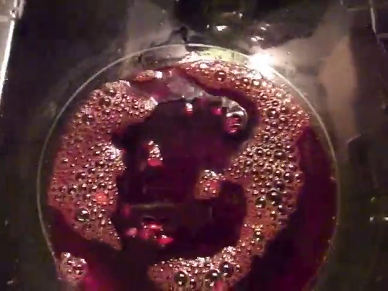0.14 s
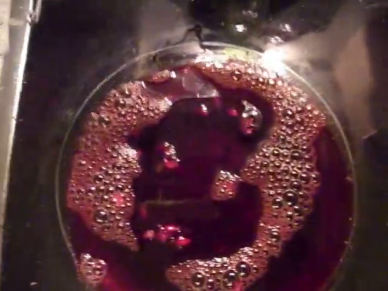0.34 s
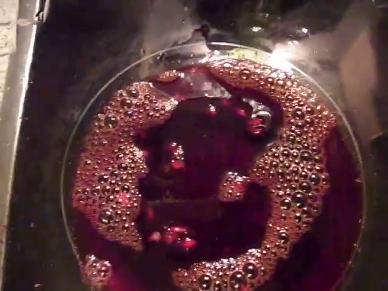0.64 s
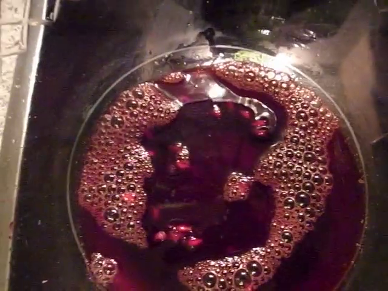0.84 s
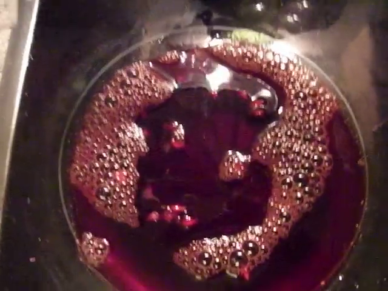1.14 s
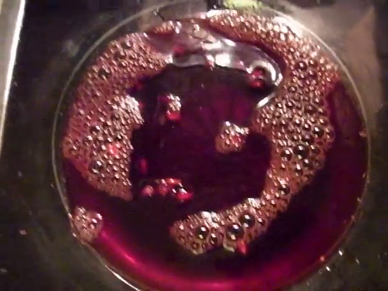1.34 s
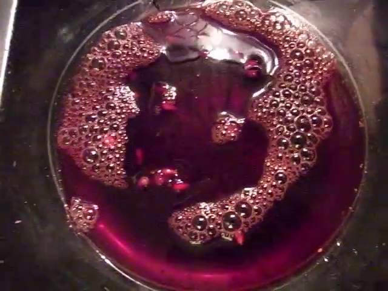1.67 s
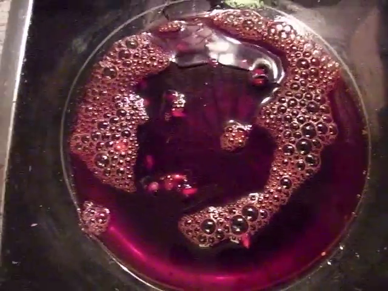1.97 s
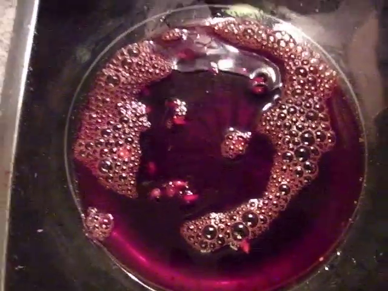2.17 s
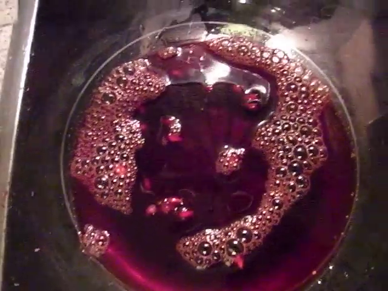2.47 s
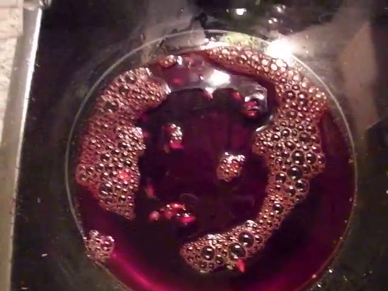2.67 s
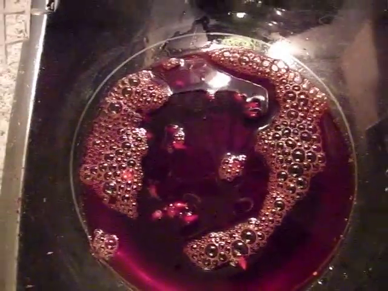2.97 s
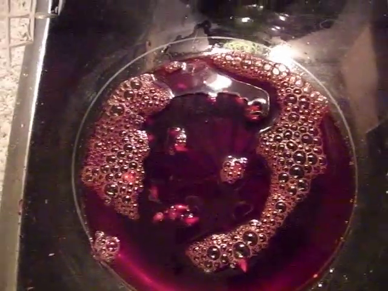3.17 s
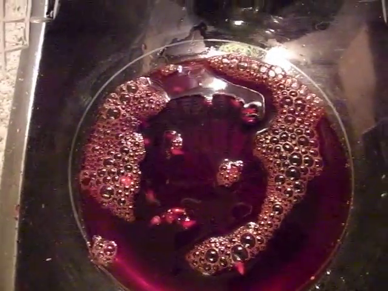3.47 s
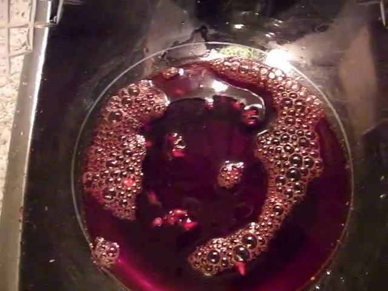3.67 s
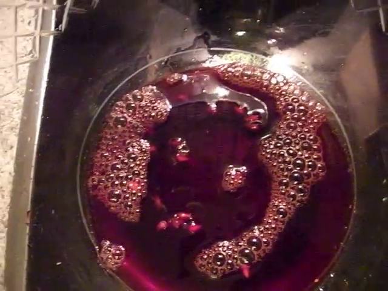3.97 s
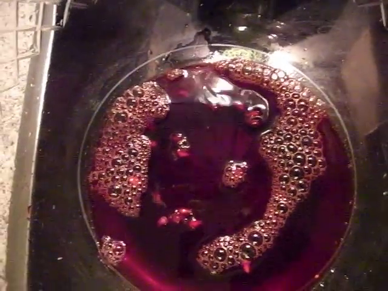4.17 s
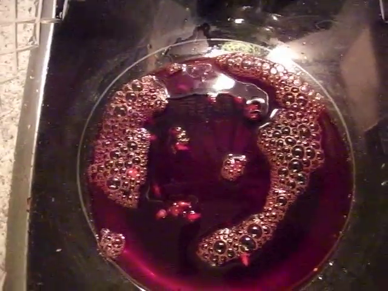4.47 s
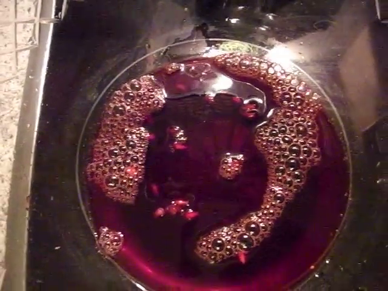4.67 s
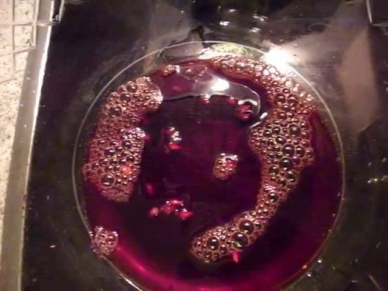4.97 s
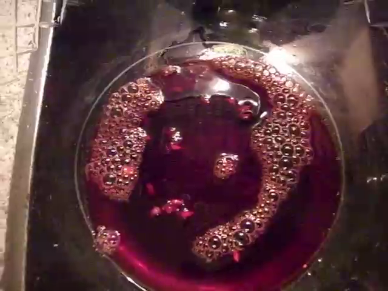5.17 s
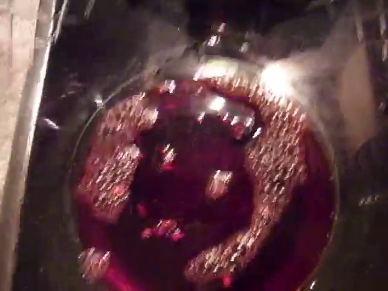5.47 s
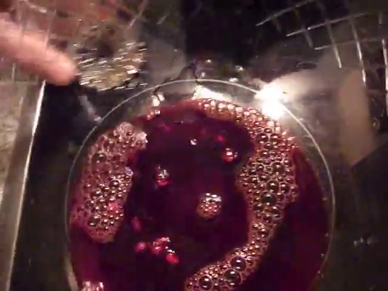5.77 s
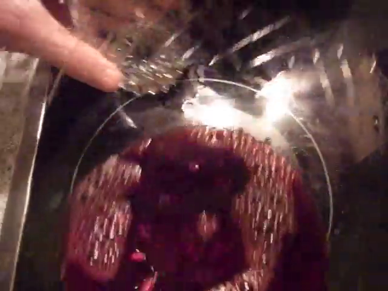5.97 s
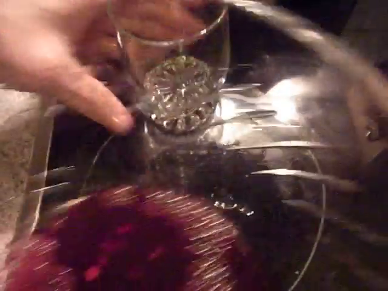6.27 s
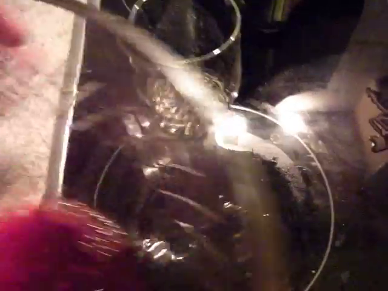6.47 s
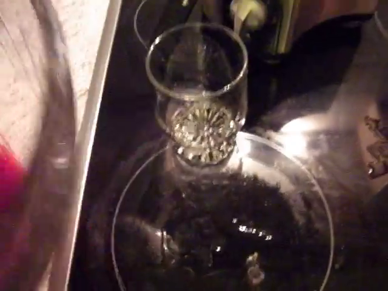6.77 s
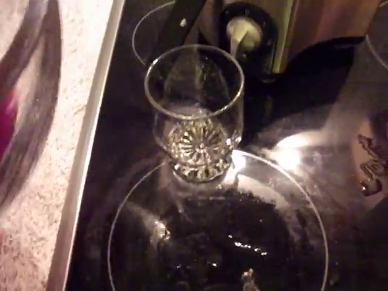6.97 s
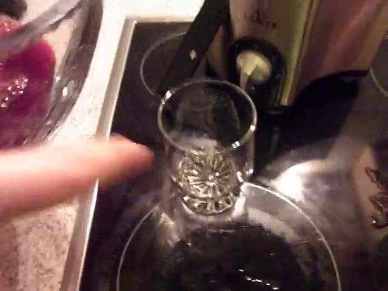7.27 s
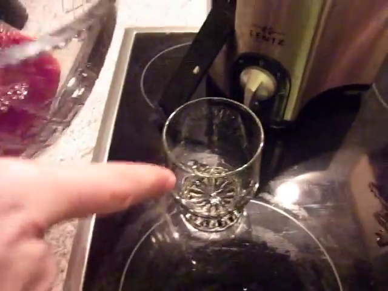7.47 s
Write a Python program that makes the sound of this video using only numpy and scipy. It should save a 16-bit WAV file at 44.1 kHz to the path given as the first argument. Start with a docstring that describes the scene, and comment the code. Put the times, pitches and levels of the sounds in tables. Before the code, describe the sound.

Close, muffled handheld pickup in a small hard kitchen: a metal utensil presses pulp in a wire strainer on a glass bowl, with dull thuds, short clinks and gritty wet grating. The pressing is busiest at first, then thins to faint ticks. Near the end the glass bowl knocks very loudly, distorting, rattles and scrapes over the hob, then leaves quiet room tone and soft bumps.

```python
"""Small hard kitchen: a metal utensil presses fruit in a wire strainer resting on a glass bowl.
Pushes thud as decaying low modes of bowl and worktop, with a wet puff of noise; metal clinks are noise cracks
with ringing modes; seeds grate as dense random slips. The bowl is then knocked and dragged aside on the hob.
Echo, room tone, deep camera jolts and soft bumps complete it; the narrow-band microphone clips on the
hardest knock."""
import sys
import numpy as np
from scipy import signal
from scipy.fft import rfft, irfft
from scipy.io import wavfile

SR = 44100
rng = np.random.default_rng(int(sys.argv[2]) if len(sys.argv) > 2 else 0)


def to_wav(sig):
    """Store sig (one row per channel, or 1-D mono) as 16-bit WAV at the path in sys.argv[1].

    Samples outside -1..1 are clipped; the rate is SR.
    """
    pcm = np.clip(np.atleast_2d(sig), -1, 1) * 32767
    pcm = np.round(pcm).astype(np.int16)
    wavfile.write(sys.argv[1], SR, pcm.T)  # frames by channels


N = 336042

# Steady kitchen air, relative spectrum: f/Hz, density/dB
ROOM_TONE_SPECTRUM = [(40, -14), (60, -5), (100, -1), (160, -4), (260, -2), (420, -3), (520, -8),
                      (650, -12), (1000, -14), (2000, -17), (3200, -20), (4100, -22), (5400, -40)]
# Echo decay: f/Hz, t60/s
KITCHEN_T60 = [(200, 0.37), (400, 0.41), (1200, 0.52), (4000, 0.18)]
# Jolts of the hand-held camera, felt as deep rumble: t/s, level/dB
JOLTS = [(0.0, -52.5), (0.251, -44), (1.25, -41.5), (2.05, -44), (3.08, -35), (3.82, -46.5), (4.8, -45),
         (5.741, -58), (6.55, -52), (6.95, -49.5), (7.271, -45.5)]
# Soft low bumps close to the microphone: t/s, peak/dB, f/Hz, rise and fall time constant/s
BUMPS = [(6.712, -37, 109, 0.0058), (7.267, -43, 110, 0.0063), (7.416, -30, 137, 0.0036)]
# Relative spectrum of hard contact noise: f/Hz, density/dB
CRACK_SPECTRUM = [(290, -19.5), (500, -0.5), (688, -11), (830, -10.5), (1480, -7.5), (1660, -10),
                  (2280, -16), (3260, -9.5), (4180, -23.5), (5430, -27.5), (9200, -120)]
# Relative spectrum of wet dull noise: f/Hz, density/dB
DULL_SPECTRUM = [(76, -29), (130, -10), (146, -5.5), (201, 6.5), (237, 0), (349, 0.5), (535, -5.5),
                 (618, -19.5), (800, -13), (1040, -44.5), (1760, -120)]
# Worktop boom modes: f/Hz, relative level/dB, free t60/s
BOOM_MODES = [(90.2, -14, 0.24), (101.7, -10, 0.3), (124, -13, 0.079)]
# Modes of the bowl on the worktop: f/Hz, relative level/dB, free t60/s
BOWL_MODES = [(214, -11, 0.085), (265.3, 1, 0.14), (305.2, -5.5, 0.2), (358.6, -1, 0.2),
              (398.7, -2.5, 0.28), (433, -8, 0.65), (505.8, 7, 0.059), (556.5, -1, .15)]
# Modes of strainer, utensil and rim: f/Hz, relative level/dB, free t60/s
METAL_MODES = [(724, -9, 0.38), (832.6, -3.5, 0.55), (900, -12, 0.12), (984, -2, 0.072), (1080, 3, 0.47),
               (1260, -0.5, 0.28), (1370, -1.5, 0.22), (1526, -2.5, 0.16), (1616, -4.5, 0.39),
               (1692, -0.5, .25), (1930, 0, 0.13), (2214, -9, 1), (2260, -6.5, 0.45), (2860, -1.5, 0.031),
               (2930, -15.5, 0.064), (2950, -10, 0.75), (3370, -12, 0.82), (3680, -11, 0.26),
               (4115, 7.5, 0.075)]
# Modes of the glass bowl, a close pair beats: f/Hz, relative level/dB, free t60/s
GLASS_MODES = [(511, 0, .2), (716, -6, .3), (883, -2, .14), (980, -6, .25), (1077, -5, .25), (1351, -6, .4),
               (1658, -6, .28), (1930, -6, .15), (2902, -8, .19), (3370, -6, .2), (2428, 0, .6),
               (2440, -2, .6)]
# Seeds grating on mesh: t/s, dull level/dB, bright level/dB
PRESSING = [(0.0, -22.5, -37), (0.27, -31, -43), (0.65, -29.5, -37), (1.03, -35.5, -34.5), (1.21, -36, -36),
            (1.52, -28.5, -36), (1.95, -39.5, -36.5), (2.22, -35.5, -33), (2.51, -37.5, -39),
            (3.24, -33, -36), (3.68, -42, -49), (4.32, -40, -42), (5.03, -42, -50), (5.7, -41.5, -46)]
# Glass dragged on the hob: t/s, dull level/dB, bright level/dB
DRAGGING = [(5.72, -60, -34), (5.78, -38, -38.5), (5.93, -61, -50.5), (6.06, -34, -41), (6.12, -36, -29.5),
            (6.17, -28, -26.5), (6.24, -39.5, -32), (6.33, -40.5, -42.5), (6.45, -49, -50.5),
            (6.7, -63, -56)]
# Glass bowl knocking the hob: t/s, peak under 2 kHz/dB, mean level over 2 kHz/dB, low ring f/Hz,
# high ring f/Hz, ring against crack/dB, crack fall time constant/s
KNOCKS = [(5.704, -26.5, -49, 1930, 2428, -4, .02), (5.729, -20.5, -40, 1930, 3370, -16, 0.0056),
          (5.7452, 5, -1, 1351, 3370, -36, .0022), (5.757, -5.5, -27, 511, 2428, -5.5, 0.014),
          (5.967, -36, -44, 995, 2428, -14, 0.0062), (5.999, -16, -23.5, 876, 2440, -15, 0.0092),
          (6.042, -17.5, -39.5, 970, 2902, -18, 0.019), (6.08, -18, -29.5, 1344, 3370, -14, .005),
          (6.094, -7, -19.5, 850, 3370, -20, 0.0058), (6.13, -7.5, -23.5, 862, 3370, -11, 0.018),
          (6.154, -5.5, -22.5, 1044, 3370, -20, 0.0069)]
# Metal touches of utensil, mesh and rim: t/s, peak under 2 kHz/dB, mean level over 2 kHz/dB, low ring f/Hz,
# high ring f/Hz, ring against crack/dB, share of free ring time/1
CLINKS = [(.062, -26.5, -30, 1450, 3150, -8, .46), (.26, -41, -35.5, 729, 2780, 5, 0.56),
          (.304, -20, -29.5, 1420, 2670, -3.5, 0.75), (.48, -45.5, -35, 721, 3020, -1, 0.43),
          (.513, -25.5, -32.5, 1780, 2660, -3.5, 0.61), (.557, -21, -34.5, 1490, 2740, -6, .38),
          (.765, -13.5, -12, 1040, 2550, -5.5, 0.14), (1.037, -40.5, -29, 1110, 2890, -4.5, 0.44),
          (1.256, -18.5, -43, 1075, 2950, -3, 0.35), (1.385, -20, -23, 1930, 2400, -6, .32),
          (1.479, -31.5, -34.5, 1500, 2730, -0.5, 0.22), (1.541, -19.5, -38.5, 1534, 2970, -2, 0.23),
          (1.708, -29, -29.5, 1420, 3370, -8, 0.68), (1.793, -24, -33, 1580, 2860, -4, 0.37),
          (1.975, -16, -22, 1570, 2734, 0, 0.18), (2.143, -29, -51, 1400, 2840, 7.5, 0.32),
          (2.176, -19.5, -39, 1555, 3680, 8, 0.48), (2.233, -20, -33, 1080, 2800, -12.5, .55),
          (2.256, -20, -33, 1554, 3350, -1, 0.67), (2.359, -31.5, -32, 1260, 2430, -9.5, 0.63),
          (3.068, -33.5, -31, 1390, 3110, -2, 0.44), (3.115, -33.5, -31, 721, 3370, 1, 1),
          (3.146, -17, -22.5, 1580, 2740, -10.5, 0.65), (3.372, -32, -39.5, 829, 2740, -1, 0.34),
          (3.412, -28.5, -53, 1290, 2930, 9, 1), (3.455, -34.5, -48, 1690, 2790, 0.5, 0.84),
          (3.538, -26.5, -45, 810, 2740, -6.5, 0.39), (3.797, -40, -43.5, 732, 3680, 5, 0.38),
          (3.909, -23.5, -52, 834, 3180, -1.5, 0.27), (3.942, -23, -52, 1370, 3150, 1, 0.74),
          (4.034, -44, -50, 1390, 3680, 7, 0.76), (4.126, -29.5, -48, 824, 2620, -6, .6),
          (4.157, -29.5, -47, 829, 2220, -8, 0.9), (4.255, -33, -42, 1370, 2950, 5, .35),
          (4.272, -43, -38, 1370, 4115, 3, 0.73), (4.343, -29.5, -59, 1090, 3070, -9.5, 0.78),
          (4.603, -28, -42, 1460, 2930, 0, 0.17), (4.627, -36, -58, 1080, 3720, 5, 1),
          (4.729, -37, -38, 1470, 3380, 0, 0.46), (4.885, -33.5, -53, 1460, 3680, 14, 0.63),
          (5.035, -42, -40, 900, 3250, 0, 0.79), (5.254, -29.5, -39, 829, 3680, 6, 0.39),
          (5.391, -39, -53, 1500, 3700, 4, .75), (5.437, -38.5, -48, 829, 3220, 0.5, .6),
          (5.519, -43, -46, 837, 2910, -7.5, .5), (6.766, -33, -62, 960, 2850, -3.5, .5)]
# Pushes and knocks felt by the bowl: t/s, peak/dB, mean boom level/dB, pitch that rings most f/Hz
THUDS = [(0.003, -16, -27, 415), (0.062, -5, -23, 355), (0.307, -11.5, -25, 232), (0.318, -2.5, -26, 352),
         (0.496, -16.5, -20, 394), (0.564, -5, -30, 336), (0.765, -8.5, -21, 407), (1.051, -15.5, -23, 317),
         (1.261, -14.5, -15.5, 423), (1.385, -17.5, -31, 530), (1.484, -9, -37, 347),
         (1.541, -11.5, -26.5, 382), (1.694, -20, -35, 358), (1.794, -18.5, -32.5, 384),
         (1.975, -17.5, -30, 297), (2.178, -7, -19.5, 393), (2.235, -23, -23, 450), (2.257, -16, -24, 420),
         (3.08, -20, -22, 361), (3.146, -23, -23, 223), (3.211, -23.5, -46, 540),
         (3.559, -24.5, -42.5, 347), (3.841, -27.5, -50, 517), (3.913, -30, -53.5, 545),
         (4.176, -25.5, -47, 191), (4.393, -30.5, -44, 433), (5.744, -11, -32, 475),
         (5.755, -13.5, -22.5, 493), (5.968, -26.5, -45, 471), (5.998, -20, -41, 458),
         (6.075, -14.5, -36, 436), (6.091, -10, -27, 229), (6.129, -7.5, -28, 291), (6.15, -18.5, -30, 456)]

ROOM_TONE_DB, KITCHEN_DB = -46, -7
BOWL_NEARER_DB = -7  # the lifted bowl is near the microphone, so its echo counts less
JOLT_RISE_S, JOLT_FALL_S, TREMOR_DB = 0.04, 0.11, -62
BOOM_UNDER_DULL_DB = 4.5
CREST_DB, BOOM_CREST_DB = 8, 1  # peak above mean level: contacts over 2 kHz, boom
CONTACT_S = 0.36  # longest sound computed for one contact
CLINK_CRACK_S = 0.013
# faint stray touches: peak over bright grating, ring against crack, share of free ring time
TICKS_DB, TICKS_RING_DB, TICKS_FREE = 6.5, 3.5, 0.59
THUD_RISE_S = 0.0024
# a hand takes the bowl and shortens its ring (shares of free ring time)
GRABBED_S, RESTING_FREE, GRABBED_FREE = 5.6, 1, 0.79
# the glass rings more freely until it sits on the hob (shares of free ring time)
LANDED_S, LIFTED_FREE, LANDED_FREE = 5.9, 0.68, 0.2
# the bowl rocks to rest in weakening taps
ROCK_S, ROCK_EVERY_S, ROCK_TAPS, ROCK_HZ = 2.348, 0.066, 6, 550
ROCK_DB, ROCK_LOSS_DB, ROCK_BOOM_DB = -22, 2.5, -11  # first tap, loss per tap, boom against tap
CAPSULE_TOP, OVERLOAD = 0.8, 0.72  # soft and hard ceilings, full scale = 1
MIC_ROLLOFF_HZ, MIC_STOP_HZ, OUTPUT_STOP_HZ = 4000, 4984, 16000


def from_db(db):
    """Decibels to gain."""
    return 10 ** (np.asarray(db) / 20)


def rms_one(x):
    """Scaled to rms 1."""
    return x / np.sqrt(np.mean(x ** 2) + 1e-20)


def peak_one(x):
    """Scaled to peak 1."""
    return x / np.max(np.abs(x))


def add(track, s, sound):
    """Lay a sound into the track at time s."""
    i = round(s * SR)
    track[i:i + len(sound)] += sound[:N - i]


def curve(rows):
    """Level columns over time, near silent outside the table."""
    s, *columns = np.transpose(rows)
    t = np.arange(N) / SR
    return [np.interp(t, s, c, left=-99, right=-99) for c in columns]


def at_hz(points, hz):
    """Table read on a log-frequency axis."""
    table = np.array(points)
    return np.interp(np.log(hz), np.log(table[:, 0]), table[:, 1])


def band_pass(x, edges_hz):
    """Second-order Butterworth band."""
    return signal.sosfilt(signal.butter(2, edges_hz, "band", fs=SR, output="sos"), x)


def colour(x, spectrum):
    """Input shaped by a spectrum, rms 1; 60 dB further down outside the table."""
    hz = np.maximum(np.arange(len(x) // 2 + 1) * SR / len(x), 1)
    outside = (hz < spectrum[0][0]) | (hz > spectrum[-1][0])
    gain = from_db(at_hz(spectrum, hz) - 60 * outside)
    return rms_one(irfft(rfft(x) * gain, len(x)))


def drift(rate_hz):
    """Slow random wander of spread 1: low-passed noise, computed every 40 samples."""
    r = np.exp(-2 * np.pi * rate_hz * 40 / SR)
    noise = rng.standard_normal(N // 40 + 2002)
    slow = signal.lfilter([1], [1, -2 * r, r * r], noise)[2000:]  # settled part
    return np.interp(np.arange(N) / 40, np.arange(len(slow)), rms_one(slow))


def grains(per_s, size_db):
    """Random slips of uneven size and sign."""
    sizes = from_db(size_db * np.minimum(rng.exponential(1, N), 4))
    signed = sizes * rng.choice([-1, 1], N)
    return signed * (rng.random(N) < per_s / SR)


def patchy(x, patchy_db, rate_hz):
    """Wet pulp makes each half-octave swell and fade on its own."""
    edges_hz = 400 * 2 ** np.arange(0, 4, 0.5)
    bands = [band_pass(x, edges) for edges in zip(edges_hz, edges_hz[1:])]
    return rms_one(sum(band * from_db(patchy_db * drift(rate_hz)) for band in bands))


def ring(force, hz, t60_s):
    """Two-pole resonator: a unit click sets a decaying sine of height 1 ringing."""
    r, w = from_db(-60 / (t60_s * SR)), 2 * np.pi * hz / SR
    return signal.lfilter([0, np.sin(w)], [1, -2 * r * np.cos(w), r * r], force + 1e-18)


def swell(rise_s, fall_s, t):
    """Envelope of a contact that builds and lets go."""
    rise = 1 - np.exp(-t / np.maximum(rise_s, 2e-4))
    return rise * np.exp(-t / np.maximum(fall_s, 1e-3))


def nearness_db(modes, pitch_hz, focus_db, most_db):
    """Modes far from the struck spot's pitch are driven less; each blow differs a little."""
    octaves = np.log2(np.array(modes)[:, 0] / pitch_hz)
    return -np.minimum(focus_db * octaves ** 2, most_db) + rng.normal(0, 1.7, len(modes))


def struck(modes, extra_db, rise_s, free):
    """Modes set off by one blow, peak 1; a hand or wet pulp on the body shortens the ring."""
    hz, level_db, t60_s = np.transpose(modes)[:, :, None]
    t = np.arange(int(CONTACT_S * SR)) / SR
    phase = rng.uniform(0, 2 * np.pi, hz.shape)
    tones = from_db(level_db + extra_db[:, None]) * np.sin(2 * np.pi * hz * t + phase)
    fall_s = free * t60_s / np.log(1000)
    return peak_one((tones * swell(rise_s, fall_s, t)).sum(axis=0))


def contacts(rows, modes):
    """A ragged crack, strongest near the struck spot's pitch, then the modes near that pitch ring on."""
    out, white = np.zeros(N), rng.standard_normal(N + SR)
    crack = colour(grains(4000, size_db=5.5), CRACK_SPECTRUM)
    halves = [signal.sosfilt(signal.butter(4, 2000, kind, fs=SR, output="sos"), crack)
              for kind in ("low", "high")]
    t = np.arange(int(CONTACT_S * SR)) / SR
    for s, low_db, high_db, low_hz, high_hz, ring_db, free, crack_s in rows:
        i = min(round(s * SR), N - len(t))
        here = slice(i, i + len(t))
        broad_gain = from_db(-1.2 * max(ring_db + 3.0, 0))  # clean touches carry little broad rasp
        for half, db, hz in zip(halves, (low_db, high_db + CREST_DB), (low_hz, high_hz)):
            rings = struck(modes, nearness_db(modes, hz, 1200.0, 18.3), 0.00033, free)
            spot = rms_one(ring(white[here], hz, 43.0 / hz))  # hump of rasp round the pitch
            rasp = broad_gain * rms_one(half[here]) + 1.26 * spot
            burst = peak_one(rasp * swell(0.002, crack_s, t))
            add(out, s, from_db(db) * peak_one(burst + from_db(ring_db) * rings))
    return out


def room_tone():
    """Steady kitchen air: shaped noise."""
    return from_db(ROOM_TONE_DB) * colour(rng.standard_normal(N), ROOM_TONE_SPECTRUM)


def kitchen(x):
    """Diffuse echo: noise dying octave by octave, building up over the first reflections."""
    t, tail = np.arange(SR) / SR, 0
    white = rng.standard_normal(SR)
    for low_hz in 150 * 2 ** np.arange(5):
        t60_s = at_hz(KITCHEN_T60, low_hz * np.sqrt(2))
        tail = tail + band_pass(white, [low_hz, 2 * low_hz]) * from_db(-60 * t / t60_s)
    tail = tail * (1 - np.exp(-t / 0.012))
    tail = tail / np.linalg.norm(tail) * np.sqrt(4650 / (SR / 2))  # share of the spectrum covered
    return signal.fftconvolve(x, tail)[:N]


def jolts():
    """Gain of the deep rumble: a faint tremor and a swell after each jolt."""
    out, t = np.full(N, from_db(TREMOR_DB)), np.arange(SR) / SR
    for s, db in JOLTS:
        add(out, s, from_db(db) * peak_one(swell(JOLT_RISE_S, JOLT_FALL_S, t)))
    return out


def rumble(slips):
    """Camera jolts: the deep band of the slips, swelling at each jolt."""
    return jolts() * rms_one(band_pass(slips, [28, 60]))


def bumps():
    """Each bump is a short, rapidly decaying burst of low pressure."""
    out, t = np.zeros(N), np.arange(SR // 10) / SR
    for s, peak_db, hz, length_s in BUMPS:
        pulse = np.sin(2 * np.pi * hz * t) * swell(length_s, length_s, t)
        add(out, s, from_db(peak_db) * peak_one(pulse))
    return out


def grating(slips):
    """Dense slips shake the bodies: partly as broad rasp, partly through mesh and worktop modes."""
    dull_db, bright_db = np.maximum(curve(PRESSING), curve(DRAGGING))
    seeds = grains(150, size_db=1.0)
    dealt = rng.integers(0, len(METAL_MODES), N)  # each seed snap excites one mode of the mesh
    mesh = sum(from_db(db) * ring(seeds * (dealt == k), hz, 0.033 * t60_s)
               for k, (hz, db, t60_s) in enumerate(METAL_MODES))
    rasp = patchy(colour(slips, CRACK_SPECTRUM), patchy_db=1.5, rate_hz=16.0)
    bright = rasp + from_db(-9.5) * rms_one(mesh)
    dull = colour(grains(330, size_db=2.0), DULL_SPECTRUM)
    boom = rms_one(sum(from_db(db) * ring(slips, hz, 1.5 * t60_s) for hz, db, t60_s in BOOM_MODES))
    return (from_db(bright_db + 0.57 * drift(22)) * bright
            + from_db(dull_db + 1.1 * drift(10)) * dull
            + from_db(dull_db - BOOM_UNDER_DULL_DB) * boom)


def knocks():
    """The glass bowl knocks the hob, bounces and stutters: cracks with glass modes."""
    rows = []
    for *blow, crack_s in KNOCKS:
        free = LIFTED_FREE if blow[0] < LANDED_S else LANDED_FREE
        rows.append((*blow, free, crack_s))
    return contacts(rows, GLASS_MODES)


def stray_touches(count):
    """Contact rows for faint random touches whose level follows the pressing."""
    s, _, bright_db = np.transpose(PRESSING)
    when, low, high, size = rng.random((count, 4)).T
    when_s = when * s[-1]
    db = np.interp(when_s, s, bright_db) + TICKS_DB + 6 * (size - 0.5)
    low_hz, high_hz = 720 * 2 ** (1.7 * low), 2200 * 2 ** (0.44 * high)
    return zip(when_s, db, db - 16.5, low_hz, high_hz, [TICKS_RING_DB] * count, [TICKS_FREE] * count)


def clinks(stray_count):
    """Utensil, mesh and rim touch: short cracks with metal modes, listed and stray."""
    rows = list(CLINKS) + list(stray_touches(stray_count))
    return contacts([(*row, CLINK_CRACK_S) for row in rows], METAL_MODES)


def rocking_taps():
    """Thud rows for the bowl rocking to rest."""
    taps = np.arange(ROCK_TAPS)
    tap_db = ROCK_DB - ROCK_LOSS_DB * taps
    return [(ROCK_S + k * ROCK_EVERY_S, db, db + ROCK_BOOM_DB, ROCK_HZ) for k, db in zip(taps, tap_db)]


def thuds():
    """The bowl's low modes, a wet dull puff and the worktop boom under each push."""
    out, pulp = np.zeros(N), colour(rng.standard_normal(N + SR), DULL_SPECTRUM)
    for s, peak_db, boom_db, pitch_hz in list(THUDS) + rocking_taps():
        free = RESTING_FREE if s < GRABBED_S else GRABBED_FREE
        bowl = struck(BOWL_MODES, nearness_db(BOWL_MODES, pitch_hz, 60.0, 6.7), THUD_RISE_S, free)
        t = np.arange(len(bowl)) / SR
        puff = peak_one(pulp[round(s * SR):][:len(t)] * swell(THUD_RISE_S, 0.019 * free, t))
        add(out, s, from_db(peak_db) * peak_one(bowl + 0.41 * puff))
        boom = struck(BOOM_MODES, rng.normal(0, 4.5, len(BOOM_MODES)), 3 * THUD_RISE_S, free)
        add(out, s, from_db(boom_db + BOOM_CREST_DB) * boom)
    return out


def scene():
    """Blows with their echo over grating, rumble, bumps and room tone."""
    slips = grains(3000, size_db=1.5)
    background = room_tone() + rumble(slips) + bumps() + grating(slips)
    near, far = knocks(), clinks(stray_count=8) + thuds()
    echo = from_db(KITCHEN_DB) * kitchen(far + from_db(BOWL_NEARER_DB) * near)
    return (background + near + far + echo)[None]


def record(dry):
    """Input rounds loud peaks, path ends near 4 kHz, next stage clips hard and sprays treble."""
    rounded = CAPSULE_TOP * np.tanh(dry / CAPSULE_TOP)
    narrow = signal.sosfilt(signal.butter(4, MIC_ROLLOFF_HZ, fs=SR, output="sos"), rounded)
    narrow = signal.sosfilt(signal.cheby2(12, 70, MIC_STOP_HZ, fs=SR, output="sos"), narrow)
    clipped = np.clip(narrow, -OVERLOAD, OVERLOAD)
    return signal.sosfilt(signal.cheby2(12, 70, OUTPUT_STOP_HZ, fs=SR, output="sos"), clipped)


dry = scene()
out = record(dry)
to_wav(out)
```